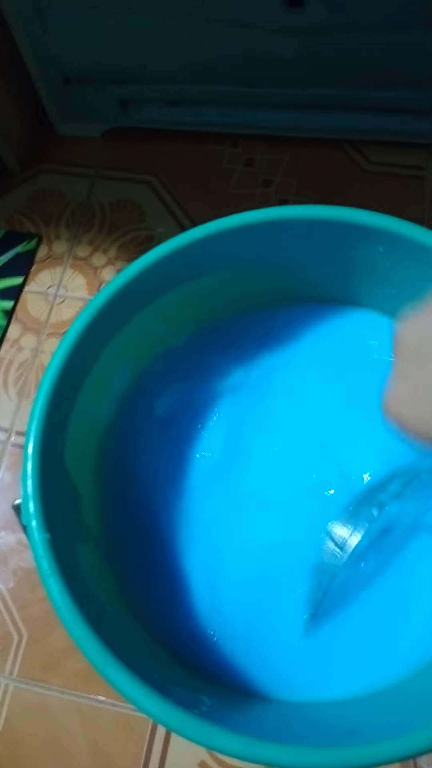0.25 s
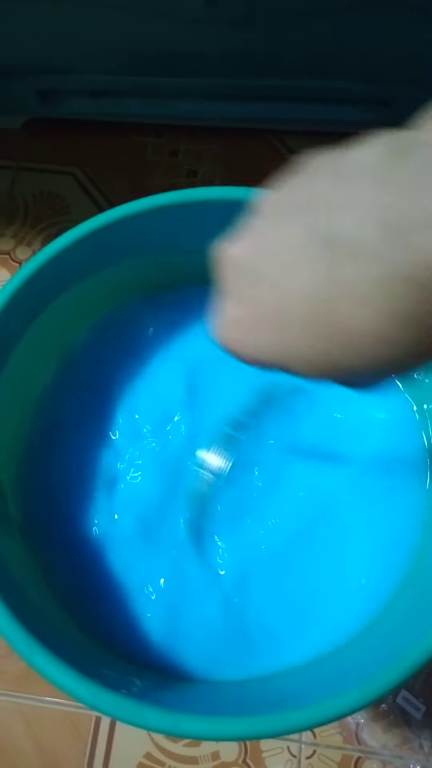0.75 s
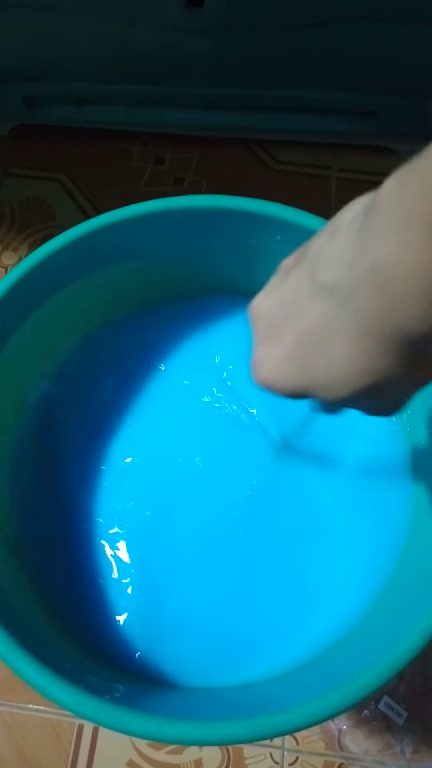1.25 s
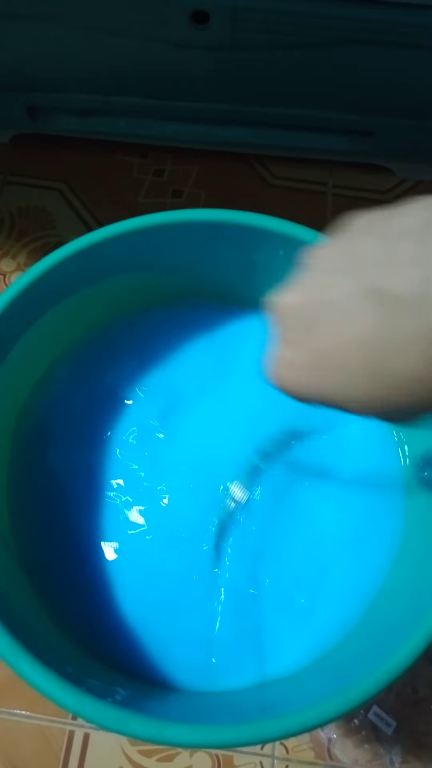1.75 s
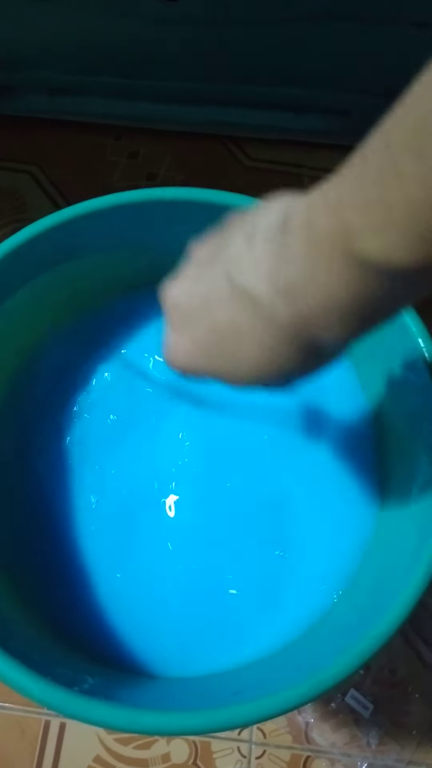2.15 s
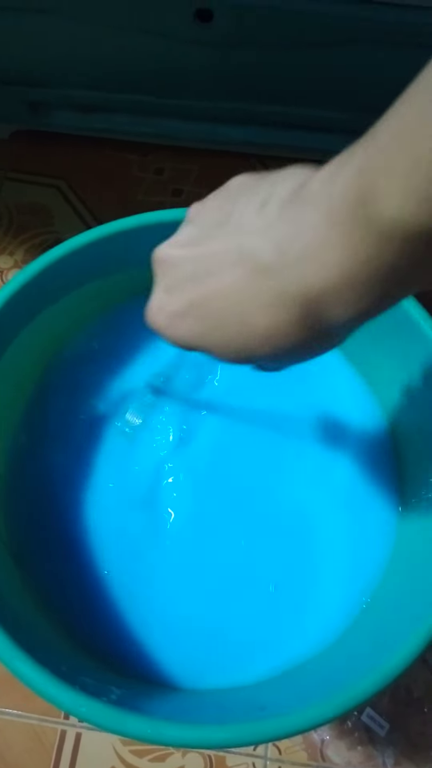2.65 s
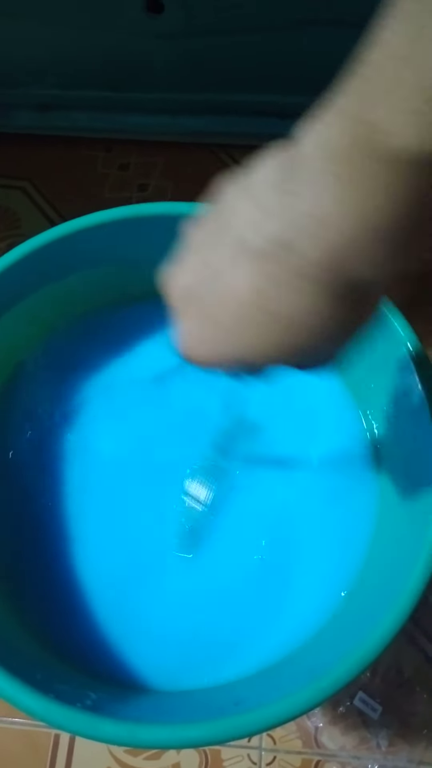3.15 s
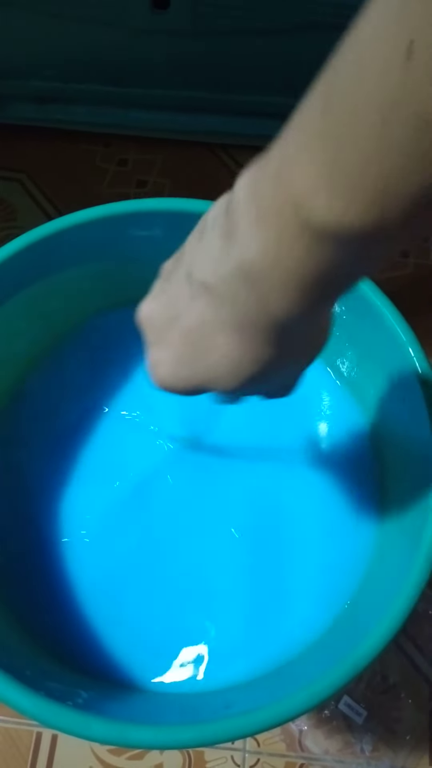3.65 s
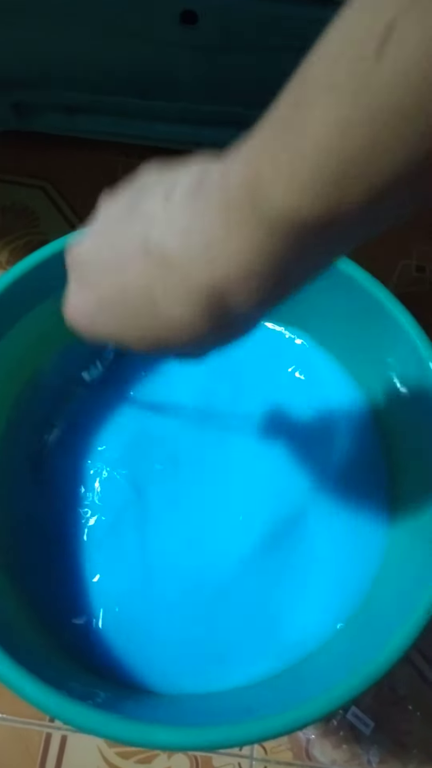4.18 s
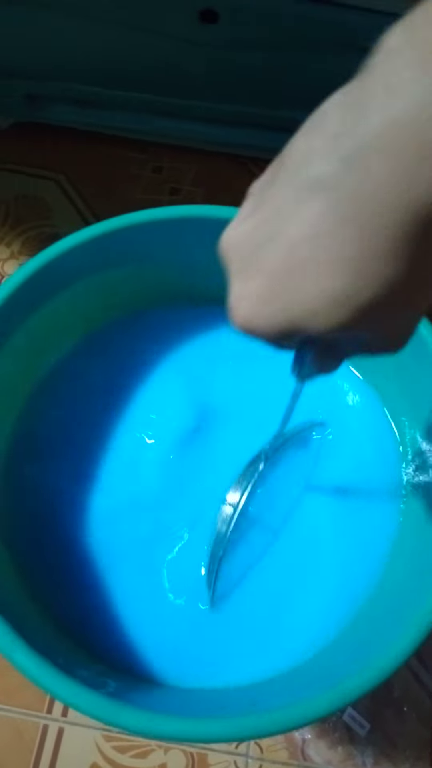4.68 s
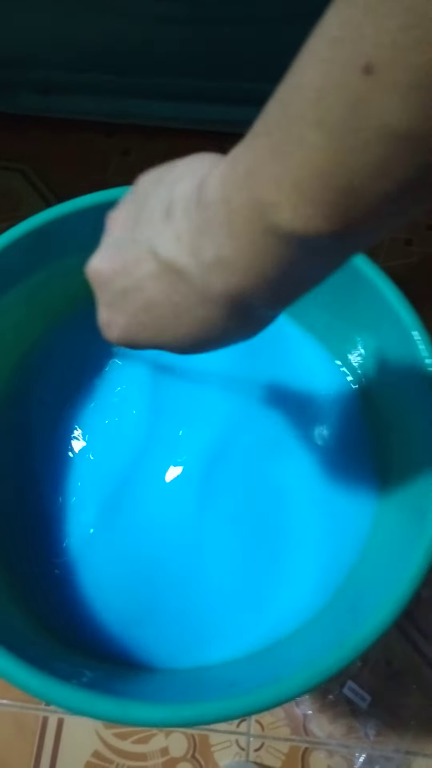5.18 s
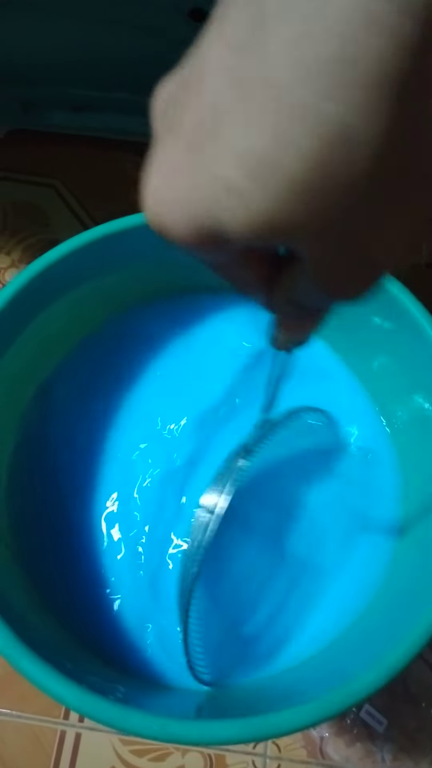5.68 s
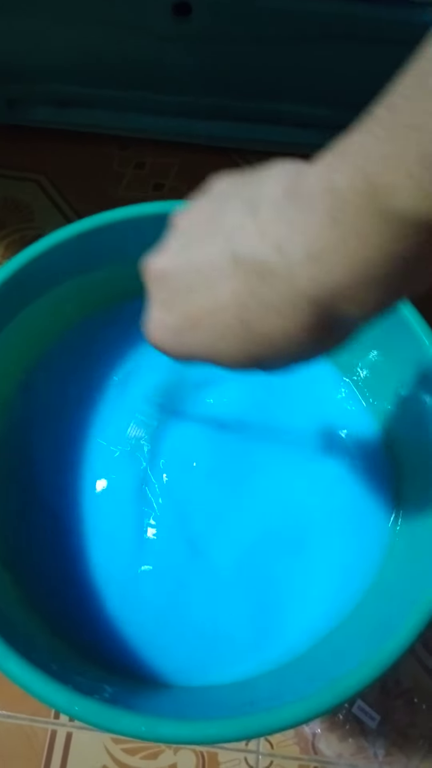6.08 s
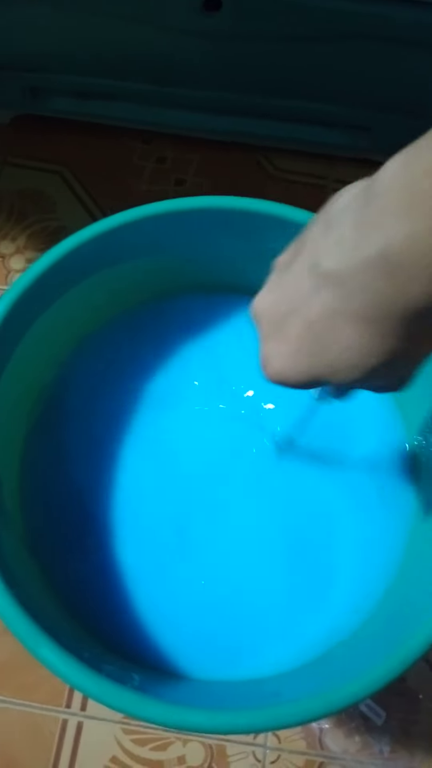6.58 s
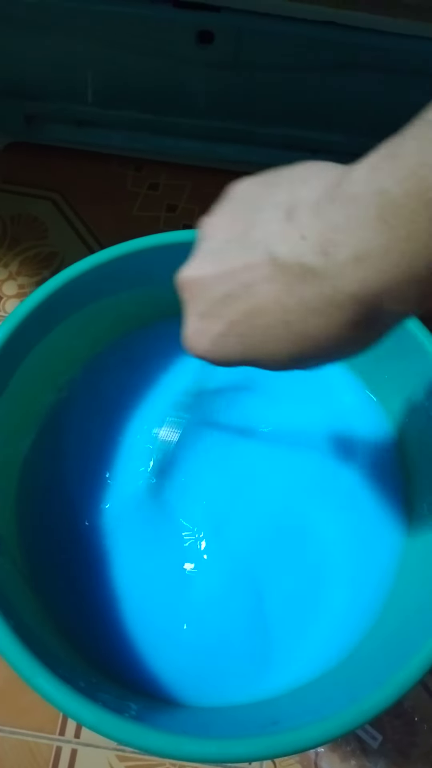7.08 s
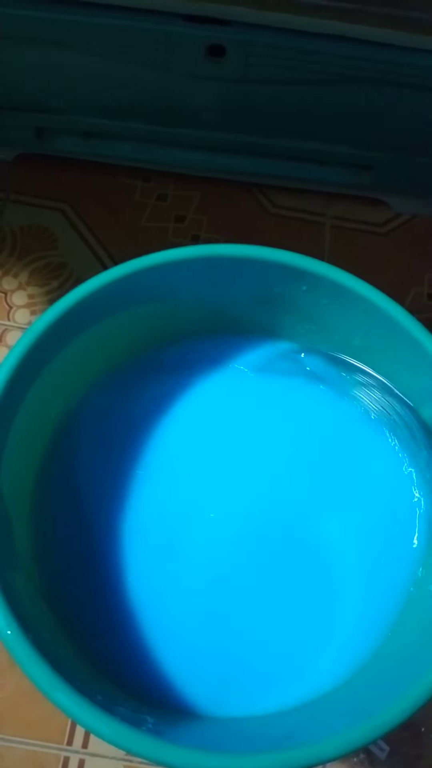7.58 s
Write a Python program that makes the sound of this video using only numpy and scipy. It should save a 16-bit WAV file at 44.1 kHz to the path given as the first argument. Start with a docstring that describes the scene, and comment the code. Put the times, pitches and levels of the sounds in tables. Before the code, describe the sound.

Hard, hollow plastic clacks in quick uneven clusters as a wire tool stirs liquid in a bucket, with faint scraping, swishing and bubbling indoors.

```python
"""In a small tiled room, a wire skimmer stirs a thick liquid in a plastic bucket and keeps knocking on its wall.
Each knock is a burst of noise plus decaying wall tones, followed by echoes and a fading noise tail.
The wires drag, swish and trickle as shaped noise and tiny clicks; bubbles are short wavering tones.
Droplets spray as thin high ticks, and an appliance hums far off as low filtered noise.
One small phone microphone, with its port resonances, hears it all."""
import sys
import numpy as np
from scipy import signal
from scipy.fft import rfft, irfft, next_fast_len
from scipy.io import wavfile
from scipy.ndimage import uniform_filter1d, map_coordinates

SR = 44100
rng = np.random.default_rng(int(sys.argv[2]) if len(sys.argv) > 2 else 0)


def rack_gain(trim_db):
    """Turn a fader trim in dB into the linear factor to multiply a signal by."""
    fader = np.asarray(trim_db, float)
    return 10 ** (fader / 20)


def wav_out(sig):
    """Save sig, one row per channel (or a flat mono array), as 16-bit PCM at SR to the path in sys.argv[1]."""
    wavfile.write(sys.argv[1], SR, np.round(np.clip(np.atleast_2d(sig).T, -1, 1) * 32767).astype(np.int16))


N = 345303  # length in samples


def unit(x):
    """Scales a sound to rms 1."""
    return x / np.sqrt(np.mean(x ** 2) + 1e-20)


def along(points, hz):
    """Reads a curve of (f/Hz, value) points on a log frequency axis."""
    f, value = np.transpose(points)
    return np.interp(np.log(hz + 1), np.log(f + 1), value)


def wobble(rate):
    """A smooth random curve through rate random points a second."""
    points = rng.standard_normal(int(N * rate / SR) + 4)
    return map_coordinates(points, [np.arange(N) * rate / SR])


def coloured(x, points):
    """Filters x to the given (f/Hz, level/dB) curve without sounding early (minimum phase)."""
    m = 2 * next_fast_len(x.shape[-1] // 2 + 4096)
    curve_db = along(points, np.fft.rfftfreq(m, 1 / SR))
    cepstrum = irfft(np.log(rack_gain(curve_db)), m)
    # folding the cepstrum onto positive times makes the filter causal
    cepstrum[1:m // 2] *= 2
    cepstrum[m // 2 + 1:] = 0
    response = np.exp(rfft(cepstrum))
    return irfft(rfft(x, m) * response, m)[..., :x.shape[-1]]


def add(track, s, sound):
    """Mixes a sound into the track at time s, in seconds."""
    part = track[round(s * SR):][:len(sound)]
    part += sound[:len(part)]


# the low hum swells and fades: t/s, level/dB
HUM_LEVEL = [(0, -57), (1.3, -61.5), (1.7, -61), (5.8, -61.5), (6.6, -60), (7.83, -68)]
# colour of the low hum: f/Hz, level per Hz/dB
HUM_COLOUR = [(20, -34), (40, -36), (60, -20), (80, 1.5), (105, -8), (128, 11.5), (155, 6), (220, -3.5),
              (400, -42)]
# colour of the steady room air: f/Hz, level per Hz/dB
AIR_COLOUR = [(100, -27), (200, -15), (300, 0), (500, -9.5), (1000, -10), (3000, -16), (9000, -11),
              (13000, -4), (16000, -6)]


def air():
    """The background: low filtered noise wavers as a hum over the steady noise of the room air."""
    s, level_db = np.transpose(HUM_LEVEL)
    hum_db = np.interp(np.arange(N) / SR, s, level_db) + 2.5 * wobble(5)
    hum = unit(coloured(rng.standard_normal(N), HUM_COLOUR)) * rack_gain(hum_db)
    room_air = unit(coloured(rng.standard_normal(N), AIR_COLOUR)) * rack_gain(-54)
    return hum + room_air


# liquid draining through the mesh: start of full level t/s, length of full level/s, level/dB
SWISHES = [(0, .12, -53), (0.644, 0.062, -36.5), (1.1, .2, -48.5), (1.79, 0.075, -52), (2.597, 0.072, -44),
           (2.95, 0.067, -54), (3.5, 0.13, -46), (3.978, 0.25, -50.5), (4.5, 0.094, -49),
           (5.055, 0.19, -45), (5.602, .15, -47.5), (6.252, 0.32, -49.5), (6.905, .18, -46.5),
           (7.089, .14, -46.5), (7.282, 0.13, -42), (7.519, 0.24, -44.5)]


def swish_level():
    """Hiss level in dB: each swish rises fast, holds and trails off."""
    rise, fall, still_db = 400, 150, -73  # dB per second, dB per second, hiss between swishes
    t = np.arange(N) / SR
    levels = []
    for s, length, db in SWISHES:
        edge = np.minimum(rise * (t - s), fall * (s + length - t))
        levels.append(db + np.minimum(0, edge))
    return np.maximum(still_db, np.max(levels, axis=0))


# drag of the wires through the liquid and along the wall: t/s, level/dB
DRAG = [(0, -62), (.3, -68.5), (.7, -59.5), (.95, -68), (1.25, -59.5), (1.8, -65), (3, -66.5), (3.25, -65),
        (4.55, -56.5), (4.9, -76), (5.15, -57), (5.4, -76), (5.75, -57.5), (6.2, -68.5), (6.8, -65.5),
        (7.45, -60), (7.62, -53), (7.83, -61)]
# colour of the scrape: f/Hz, level per Hz/dB
SCRAPE_COLOUR = [(200, 6.5), (500, -4.5), (1400, -6.5), (4000, -0.5), (5500, -26), (8000, -19)]
# colour of the swishing hiss: f/Hz, level per Hz/dB
HISS_COLOUR = [(3000, -26), (5000, -10.5), (8000, -5.5), (12000, -1), (16000, -1)]


def stirring():
    """The drag is grainy: tiny catches of wire on plastic ride on an unsteady rush of noise."""
    s, level_db = np.transpose(DRAG)
    catches = (rng.random(N) < 150 / SR) * rng.exponential(size=N)  # about 150 a second
    fade = np.exp(-np.arange(400) / SR / 0.0016)
    grain = 1 + 0.5 * np.convolve(catches, fade)[:N]
    scrape_db = np.interp(np.arange(N) / SR, s, level_db) + 3 * wobble(30)
    scrape = unit(coloured(grain * rng.standard_normal(N), SCRAPE_COLOUR)) * rack_gain(scrape_db)
    hiss_db = swish_level() + 1.4 * wobble(25)
    hiss = unit(coloured(grain * rng.standard_normal(N), HISS_COLOUR)) * rack_gain(hiss_db)
    return scrape + hiss


def trickle():
    """Tiny wet clicks off the wires, each a few cycles of a tone, get louder as the drag grows."""
    s, drag_db = np.transpose(DRAG)
    track = np.zeros(N)
    for when, pitch, size in rng.random((700, 3)):
        hz = 1000 * 4 ** pitch
        cycles = np.arange(round(12 * SR / hz)) * hz / SR
        drop = np.sin(2 * np.pi * cycles) * cycles * np.exp(-cycles / 2.4)
        level_db = np.interp(when * N / SR, s, drag_db) - 3 * np.log(size + .05)
        add(track, when * N / SR, rack_gain(level_db) * drop)
    return track


# contacts of rim and wall: t/s, blow level/dB, then three levels re the blow:
# boom 250-700 Hz level/dB, clack 2-4.5 kHz level/dB, tick 5-12 kHz level/dB
KNOCKS = [(.0136, -25, -14.5, -9, -18), (.0927, -42.5, -32, -4, -19), (.2235, -13.5, -9.5, -11, -21),
          (.2519, -11.5, -12.5, -16, -23), (.2822, -18.5, -13, -14.5, -24), (.323, -37, -30, -23, -28),
          (.3563, -29, -24, -20, -27), (.395, -40, -22, -21, -27), (.5079, -19, -18, -14.5, -18),
          (.544, -10, -17.5, -16.5, -21), (.5884, -26.5, -7.5, -9.5, -19), (.6312, -32, -11.5, -23, -20),
          (.8908, -46.5, -13, -18, -11), (1.0026, -34, -12, -3, -8), (1.0173, -23, -9, -11.5, -21.5),
          (1.041, -21.5, -13, -17.5, -21.5), (1.1435, -40, -28, -13, -13), (1.2181, -41, -13, -6.5, -12),
          (1.3057, -39, -19, -18, -27), (1.3384, -30.5, -22, -23, -34), (1.3796, -18.5, -11.5, -6, -15.5),
          (1.5182, -31.5, -17, -16, -25), (1.5729, -49, -11, -11, -13), (1.6451, -10, -15, -16.5, -23),
          (1.732, -31.5, -12.5, -15, -20), (1.7649, -37, -11, -23, -16), (2.0296, -22, -24, -16, -15),
          (2.0473, -18, -13, -16.5, -28), (2.0975, -41, -8, -24, -25), (2.2366, -39, -11, -8, -9),
          (2.2541, -40.5, -10.5, -3.5, -9), (2.3597, -12.5, -17, -18.5, -24.5),
          (2.385, -9, -16, -14.5, -19), (2.4995, -28.5, -14, -18.5, -24), (2.554, -39, -33, -15, -31),
          (2.6842, -58.5, -12, 8, -1), (2.7482, -59, -23, 2, -13), (2.7641, -25, -23, -13, -16.5),
          (2.7902, -19.5, -16, -16.5, -27), (2.816, -28.5, -7, -18, -20.5), (2.8359, -31, -2.5, -13, -21),
          (2.8612, -27, -20, -7.5, -16), (2.924, -36, -24, -3, -10), (3.0598, -9, -19.5, -19.5, -23),
          (3.0785, -9, -16, -17, -21.5), (3.395, -59, -27, -18, 4), (3.4081, -32, -14.5, -3.5, -11.5),
          (3.4326, -22.5, -13, -17, -22), (3.462, -26, -9, -13, -20), (3.49, -33, -18, -24, -25),
          (3.5129, -32, -10, -14, -23), (3.5644, -49, -22, -8, 5), (3.5861, -25, -13, -10.5, -22.5),
          (3.6253, -43.5, -8, 3, -6), (3.7823, -8.5, -17.5, -18.5, -28), (3.8034, -15.5, -8, -9, -12.5),
          (3.8383, -26, -3.5, -13, -26), (3.995, -55, -25, -8, -4), (4.0324, -47, -17.5, -9.5, -11),
          (4.1713, -12.5, -14, -14, -23), (4.1999, -18, -12.5, -24, -28), (4.2154, -25, -18, -14, -21),
          (4.3508, -40, -9.5, -3, -11), (4.4087, -51.5, -30, 8, -1), (4.459, -20, -14.5, -15, -21.5),
          (4.4862, -22, -15.5, -28, -31), (4.6024, -10, -15.5, -18.5, -25.5), (4.6663, -34.5, -2, -22, -26),
          (4.964, -55, -15, 4, -2), (5.02, -49, -1.5, -24, -28), (5.0588, -47, -10, -15, -12),
          (5.072, -24, -13.5, -9.5, -17), (5.1274, -30, -9, -21, -23), (5.1704, -34, -15.5, -15.5, -21),
          (5.2052, -46, -25, 1, -14), (5.2512, -38.5, -27, -12, -11.5), (5.4081, -52, -18, -5, -28),
          (5.4238, -26, -20, -16.5, -21), (5.45, -42, -14, -15, -20), (5.4967, -15, -14.5, -8.5, -15.5),
          (5.567, -26.5, -11.5, -16, -30), (5.6152, -37, -15, -12, -29), (5.7087, -28, -11, -13.5, -14),
          (5.7452, -39, -5, -25, -23), (5.7955, -15, -6, -5, -12.5), (5.8849, -21.5, -20.5, -20, -28),
          (6.1439, -58, -8, -7, -2), (6.2348, -28, -15.5, -11.5, -19.5), (6.2619, -18.5, -15.5, -18, -26),
          (6.2906, -24, -8.5, -13, -19.5), (6.3683, -45, -31, -5, -8), (6.4185, -24, -13, -10, -17),
          (6.485, -43, -17, -5, -17), (6.5226, -41, -19, -9, -10), (6.5836, -15.5, -17, -14.5, -18),
          (6.6264, -18, -16, -19.5, -27), (6.6971, -15.5, -15, -8, -16.5), (6.735, -27.5, -4, -19, -20),
          (6.7676, -23, -12, -16, -20), (6.8389, -12, -13, -14.5, -21), (6.8946, -32, -11, -9, -24),
          (6.9317, -40, -10, -13, -23), (7.0082, -40.5, -19, -14, -25), (7.0625, -49, -33, 0, -20),
          (7.2212, -25, -22, -17, -25), (7.3098, -28, -11.5, -15, -21.5), (7.5225, -39.5, -16, -9, -30),
          (7.5576, -33, -27, -28, -21), (7.5952, -38, -20, -7, -19), (7.6233, -42.5, -14, -1.5, -12),
          (7.6874, -34, -30, -10.5, -22), (7.7258, -38, -15, -15, -16)]


def contacts():
    """The listed knocks, joined by ten faint chance touches."""
    when, size = rng.random(10), rng.standard_normal((10, 4))
    usual = [-60, -16, -9, -18]  # blow, boom, clack and tick level/dB
    brushes = np.column_stack([when * N / SR, usual + 3 * size])
    return np.vstack([KNOCKS, brushes])


# ringing tones (modes) of the bucket wall, damped by the liquid: f/Hz, level/dB, time to fall 60 dB/s
WALL = [(275.5, -3.5, 0.062), (389.4, -3, 0.093), (474.4, -4.5, 0.095), (541, -2, 0.068),
        (587.5, -2.5, 0.053), (717, 3, 0.021), (818, -3.5, 0.042), (880, -7, 0.02), (949, 4, 0.021),
        (1063, -4.5, 0.031), (1230, 0, 0.031), (1400, 1.5, 0.03), (1472, 4, 0.015), (1618, 3.5, 0.023),
        (1800, 6.5, 0.011), (2250, 7.5, 0.01), (2441, -6.5, 0.05), (3010, 3.5, 0.015), (3340, 6.5, 0.014),
        (3921, 6, 0.021), (5100, -40, 0.0056)]


def wall_ring(t):
    """The struck wall rings as fading tones, varied because the contact point and liquid line change."""
    hz, mode_db, t60 = np.transpose(WALL)[:, :, None]
    strength, pitch = rng.standard_normal((2, len(WALL), 1))
    level = rack_gain(mode_db + 2.5 * strength - 60 * t / t60)
    ring = level * np.sin(2 * np.pi * hz * (1 + 0.031 * pitch) * t)
    return ring.sum(axis=0) * (1 - np.exp(-t / 0.0014))  # the wall takes a moment to bend


def crack(t, blow_db):
    """Contact noise: a sharp snap, a short scrape and loose wires slapping again, ever weaker."""
    scrape, snap = rack_gain(15 - 60 * t / 0.026), rack_gain(20 - 60 * t / 0.0033)
    slaps = (rng.random(len(t)) < 90 / SR) * rack_gain(12 - 60 * t / 0.18)  # about 90 a second
    chatter = np.convolve(slaps, rack_gain(-60 * t[:200] / 0.0022))[:len(t)]
    bright_noise = np.diff(rng.standard_normal(len(t) + 1))
    # weaker blows make contact more slowly: 0.18 dB longer for each dB weaker
    contact_time = 0.00014 * rack_gain(-0.18 * (blow_db + 8.5))
    return (scrape + snap + chatter) * bright_noise * (1 - np.exp(-t / contact_time))


def all_round(blow):
    """The blow summed over all directions, as the room receives it: only the low modes stay apart."""
    hz, power = np.fft.rfftfreq(len(blow), 1 / SR), np.abs(rfft(blow)) ** 2

    def blur(width_hz):
        """Averages the power over a band, so that single tones merge."""
        return np.abs(uniform_filter1d(power, round(width_hz / hz[1])))

    upper = np.where(hz < 2000, blur(width_hz=350), blur(width_hz=1200))
    power = np.where(hz < 700, blur(width_hz=60), upper)
    pulse = irfft(np.sqrt(power), len(blow))
    return np.roll(pulse, 300)[:900] * np.hanning(900) ** .5  # centred 7 ms into its window


# how long the room rings: f/Hz, time to fall 60 dB/s
ROOM = [(250, 0.59), (600, 0.35), (1500, 0.36), (4000, 0.33), (10000, 0.34), (16000, 0.28)]


def room_tail():
    """A fresh noise tail of energy 1 stands for many reflections; each frequency dies at its own speed."""
    hz, t, noise = signal.stft(rng.standard_normal(2 * SR // 5), SR, nperseg=256)
    fading = noise * rack_gain(-60 * t / along(ROOM, hz)[:, None])
    tail = signal.istft(fading, SR, nperseg=256)[1]
    tail *= 1 - np.exp(-np.arange(len(tail)) / SR / 0.011)  # reflections build up
    return tail / np.linalg.norm(tail)


# first echoes off floor tiles and near walls, before chance shifts: delay t/s, level/dB
ECHOES = [(.0035, -14.5), (.0065, -11), (0.01, -5), (0.0133, -14.5), (0.021, -8)]


def knocks():
    """Each contact snaps, chatters and rings the wall, then its echoes and tail fill the room."""
    wet_db = -3.5  # echoes and room re the blow
    track, t = np.zeros(N), np.arange(SR // 10) / SR
    for s, db, boom_db, clack_db, tick_db in contacts():
        shade = [(40, boom_db - 29), (150, boom_db - 31), (280, boom_db), (600, boom_db), (1400, -10),
                 (3000, clack_db), (8000, tick_db), (16000, tick_db - 2.5)]  # f/Hz, level/dB
        blow = rack_gain(db) * coloured(wall_ring(t) + crack(t, db), shade)
        add(track, s, blow)
        chances = rng.uniform(-1, 1, (len(ECHOES), 2))
        for (delay, echo_db), (shift, change) in zip(ECHOES, chances):
            echo = rack_gain(wet_db + echo_db + 5.4 * change) * blow
            add(track, s + delay * (1 + 0.066 * shift), echo)
        tail = signal.fftconvolve(all_round(blow), room_tail())
        add(track, s - .003, rack_gain(wet_db) * tail)  # early, as the summed blow is centred 7 ms in
    return track


# short faint tones, likely bubbles in the liquid:
# t/s, length/s, f/Hz before waver, peak level/dB before flutter
BUBBLES = [(.03, 0.048, 1560, -54), (.04, .03, 2220, -54), (.13, 0.13, 1560, -60.5),
           (0.464, 0.083, 1116, -56.5), (0.934, 0.094, 1095, -61), (1.281, 0.093, 1630, -54),
           (2.235, 0.029, 2560, -47), (2.251, 0.021, 2263, -43), (2.30, 0.043, 2270, -58),
           (2.69, 0.015, 1800, -57), (3.03, 0.068, 1210, -64), (4.007, 0.03, 2860, -56),
           (4.002, 0.18, 1212, -59.5), (4.852, .02, 3500, -63), (4.878, .13, 825, -67),
           (4.953, 0.21, 1230, -64), (5.252, 0.033, 3040, -60), (5.441, 0.021, 2800, -49),
           (7.06, 0.017, 2250, -53), (7.52, .02, 2790, -52), (7.556, 0.028, 1360, -56),
           (7.6, .03, 1300, -59), (7.62, .02, 3100, -58), (7.69, .015, 2250, -56), (7.715, .05, 1400, -58)]


def bubbles():
    """Soft sine tones waver in pitch and flutter in level."""
    track = np.zeros(N)
    flutter, waver = rack_gain(3.5 * wobble(120) - 1), .03 * wobble(350)
    for s, length, hz, db in BUBBLES:
        u = np.linspace(0, 1, round(length * SR))
        pitch = hz * (1 + waver[round(s * SR):][:len(u)])
        phase = 2 * np.pi * np.cumsum(pitch) / SR
        swell = np.sin(np.pi * u ** 0.42).clip(0) ** .5  # rises faster than it fades
        add(track, s, rack_gain(db) * swell * np.sin(phase))
    return track * flutter


def spray():
    """Tiny droplets burst at random as thin, high, quickly fading tones."""
    track, t = np.zeros(N), np.arange(SR // 200) / SR
    for when, pitch, size in rng.random((35, 3)):
        hz = 12000 * 1.4 ** (2 * pitch - 1)  # spread evenly in pitch around 12 kHz
        tick = np.sin(2 * np.pi * hz * t) * rack_gain(-60 * t / .003)
        level_db = -47 - 4 * np.log(size + .05)  # a few come out much louder
        add(track, when * N / SR, rack_gain(level_db) * tick)
    return track


def scene():
    """All sources, added together at the microphone."""
    return (air() + stirring() + trickle() + knocks() + bubbles() + spray())[None]


def low_pass(x):
    """Removes everything above the highest recorded frequency."""
    return signal.sosfilt(signal.butter(12, 17150, fs=SR, output="sos"), x)


# colour of the microphone behind its port: f/Hz, level/dB
MIC = [(20, -47), (50, 2), (200, -1.5), (1000, 2.5), (1450, 1.5), (2000, 0.5), (3850, -2.5), (4600, -9.5),
       (5600, -13.5), (7000, -10.5), (8500, -5), (10000, -17.5), (13000, -28.5), (15500, -22.5),
       (15800, -49), (22000, -42)]


def record(dry):
    """The small microphone and its port boost some pitches and weaken others."""
    mix = coloured(dry, MIC)
    return low_pass(mix)


dry = scene()
out = record(dry)
wav_out(out)
```